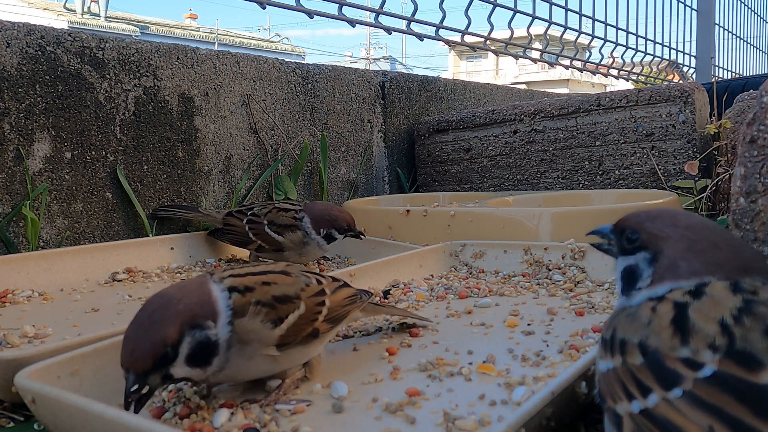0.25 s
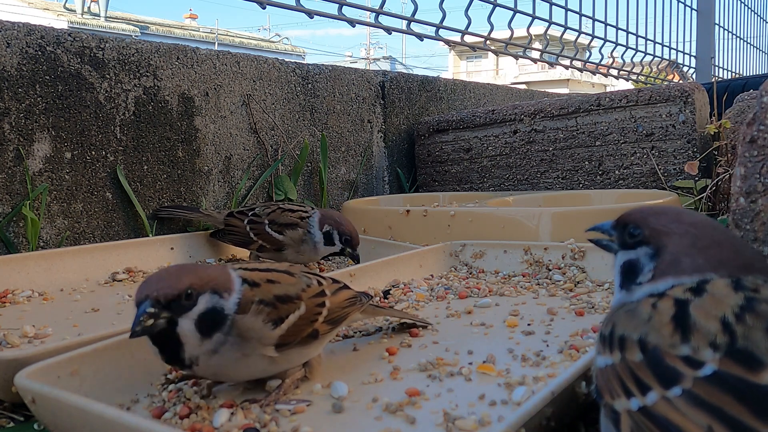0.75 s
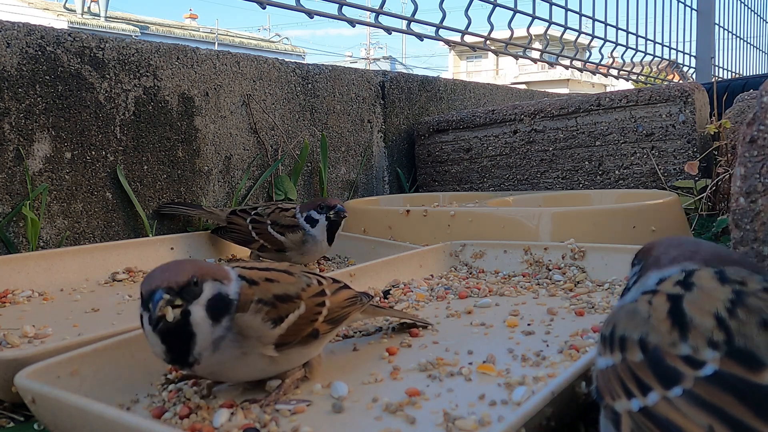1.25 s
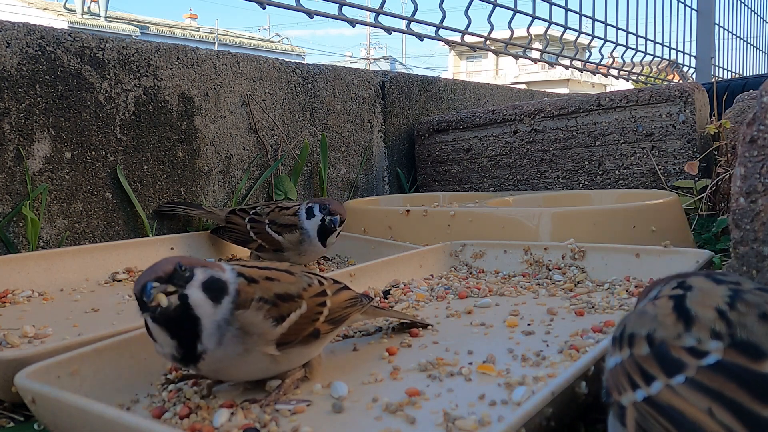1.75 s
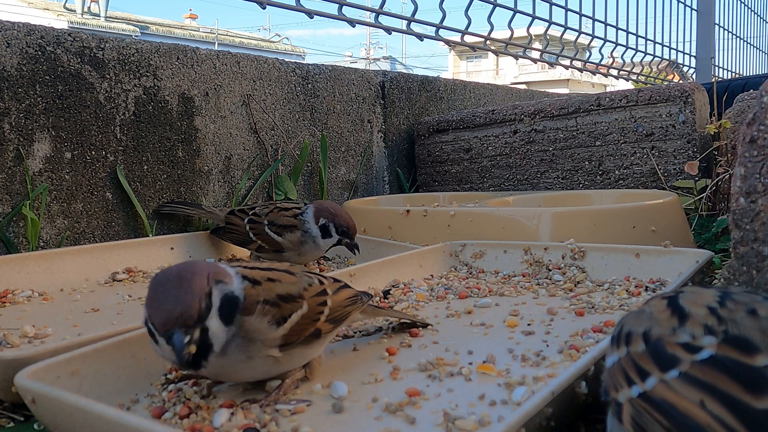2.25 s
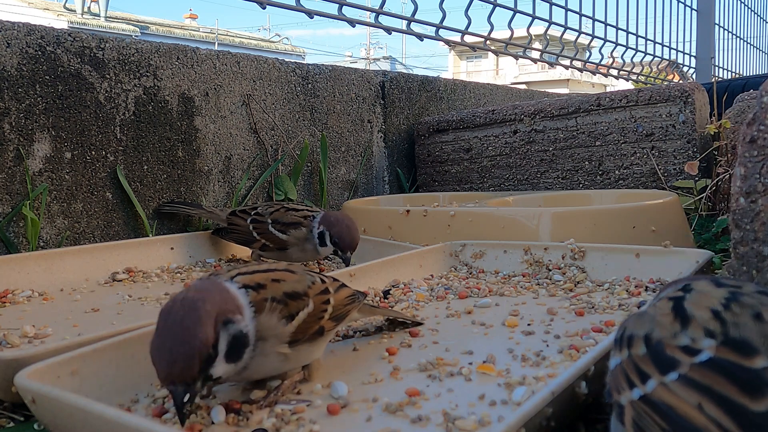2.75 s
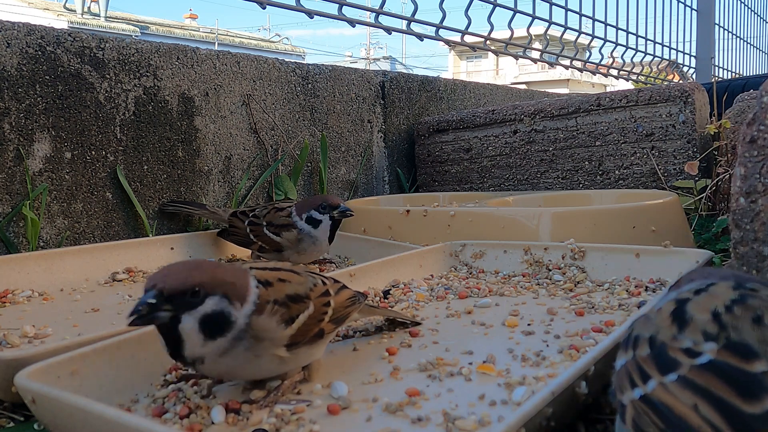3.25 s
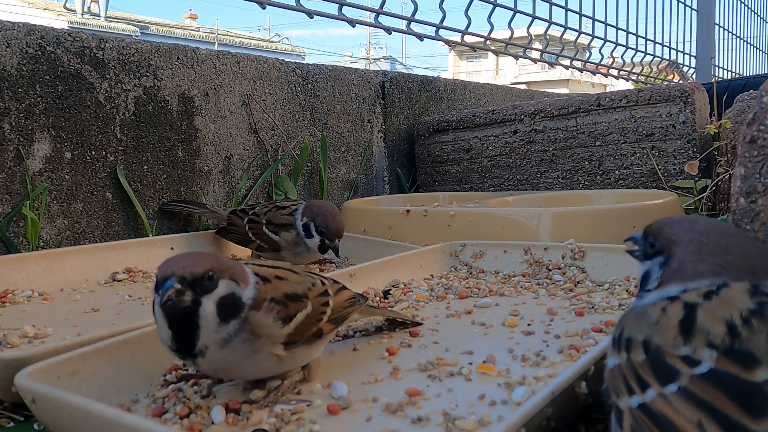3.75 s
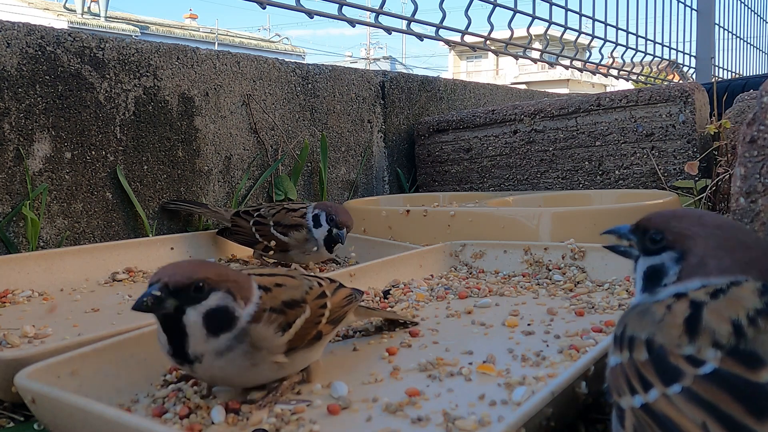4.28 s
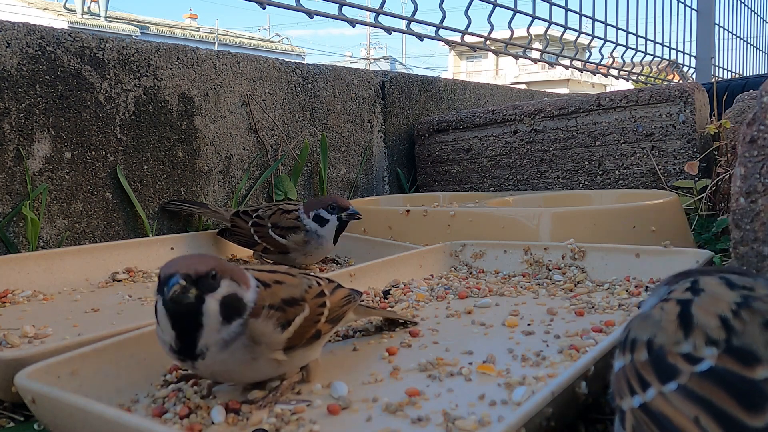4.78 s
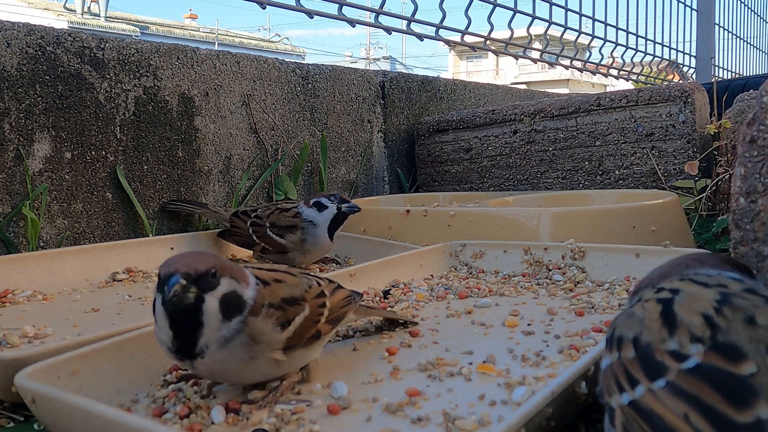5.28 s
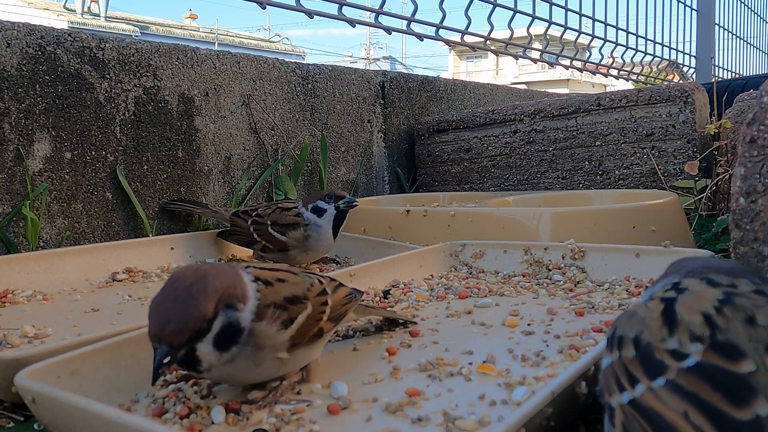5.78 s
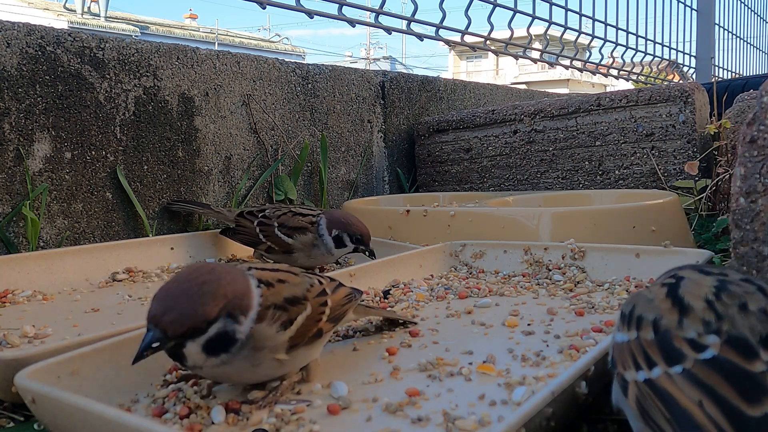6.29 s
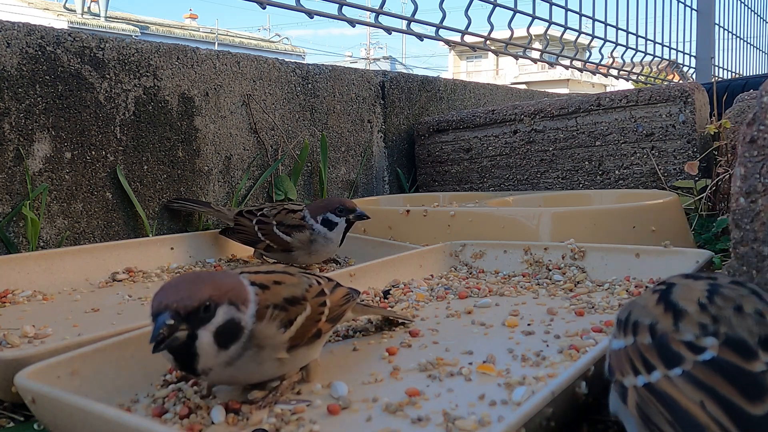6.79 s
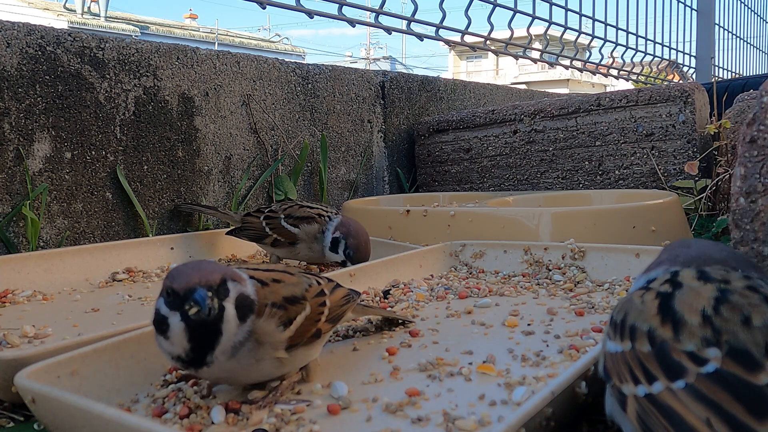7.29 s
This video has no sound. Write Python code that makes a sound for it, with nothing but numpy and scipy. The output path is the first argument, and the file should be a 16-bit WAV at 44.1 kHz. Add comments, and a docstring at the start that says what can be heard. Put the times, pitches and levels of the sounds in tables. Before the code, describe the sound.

Irregular beak taps, brittle husk clicks and brief seed patter, very close, over soft distant traffic rumble and faint far-off chirps.

```python
"""A small walled yard: sparrows feed on plastic trays close by.
Beak blows are filtered impulses that excite tray modes; husks crack as impulses in sprays of noise.
Loose seed patters as tiny pings and slides as noise; crumbs land and feet scuff the tray.
Another small bird calls far off in swept tones, mostly heard as echo.
Under it all lie a low town rumble and air noise, both shaped from random noise."""
import sys
import numpy as np
from scipy import signal
from scipy.fft import rfft, irfft, next_fast_len
from scipy.io import wavfile
from scipy.ndimage import uniform_filter1d, map_coordinates

SR = 44100
rng = np.random.default_rng(int(sys.argv[2]) if len(sys.argv) > 2 else 0)


def unload_audio(sound):
    """Save the sound as a 16-bit wav file, at the path given as the first command line argument."""
    columns = np.transpose(np.atleast_2d(sound))
    # keep every value between -1 and 1, then stretch to whole-number steps
    steps = np.round(np.clip(columns, -1, 1) * 32767)
    wavfile.write(sys.argv[1], SR, steps.astype(np.int16))


N = 332073
HIT = 4096  # samples in one contact sound
TOP_HZ = 12700  # band limit

# shoves of a beak or foot through the loose seed:
# t/s at the height, relative level/dB, rise/s, settling/s
SHOVES = [(0.17, -72, .04, .12), (0.655, -80, .02, 0.098), (0.795, -76, 0.029, 0.2),
          (0.91, -77.5, 0.048, 0.33), (1.56, -88.5, 0.23, 0.45), (2.424, -66.5, 0.0095, 0.12),
          (2.604, -51, 0.12, 0.16), (3.201, -63.5, 0.011, 0.16), (4.272, -52.5, 0.027, 0.14),
          (4.64, -74, 0.37, .3), (6.04, -74, 0.062, 0.31), (6.32, -73, .02, .12), (6.496, -67, 0.018, 0.17),
          (6.868, -68, 0.1, 0.086), (7.255, -64, 0.058, .16), (7.384, -67.5, 0.043, 0.19)]


def amp(db):
    """Level in decibels to amplitude ratio."""
    return 10 ** (np.asarray(db) / 20)


def unit(x):
    """Normalisation to rms 1."""
    return x / np.sqrt(np.mean(x ** 2) + 1e-20)


def along(points, hz):
    """Interpolation of (Hz, value) points on a logarithmic frequency axis."""
    f, v = np.transpose(points)
    return np.interp(np.log(hz + 1), np.log(f + 1), v)


def wobble(rate, size=N):
    """Slow random modulation: a smooth curve through random knots, rate of them a second."""
    knots = rng.standard_normal(int(size * rate / SR) + 4)
    return map_coordinates(knots, [np.arange(size) * rate / SR])


def filtered(x, response):
    """Linear filtering: the spectrum times a response of frequency."""
    m = next_fast_len(N + SR // 2)
    return irfft(rfft(x, m) * response(np.fft.rfftfreq(m, 1 / SR)), m)[..., :N]


def causal(gain):
    """Minimum phase: folding the cepstrum makes this gain ring only after its onset."""
    cepstrum = irfft(np.log(np.maximum(gain, 1e-6)))
    cepstrum[1:HIT // 2] *= 2
    cepstrum[HIT // 2 + 1:] = 0
    return np.exp(rfft(cepstrum))


def add(track, s, sound):
    """Superposition: mix a sound in at s seconds."""
    part = track[..., max(round(s * SR), 0):][..., :sound.shape[-1]]
    part += sound[..., :part.shape[-1]]


def pecks(click_db=7.5, knock_db=-12, spot_octaves=0.41, contact_s=.0007):
    """Modal excitation: a beak clicks through the seed, and the spot it hits decides which modes answer."""
    # beak blows: t/s, click level/dB before click_db, ring f/Hz, sheen level/dB,
    # thud level/dB, knock level/dB, knock f/Hz, rebound delay/s
    beak_blows = [(0.1129, -22.5, 2900, -49, -38.5, -27.5, 1590, .00067),
                  (2.4338, -34.5, 3200, -29.5, -53.5, -35.5, 1550, .00042),
                  (2.4762, -11.5, 4900, -34.5, -33, -19, 1715, .00062),
                  (2.627, -12, 2900, -27, -38, -18.5, 1242, .0018),
                  (2.9982, -26.5, 2600, -25, -56.5, -36.5, 1620, .00113),
                  (4.2829, -22, 6900, -21, -45, -32.5, 1076, .0017),
                  (6.528, -34.5, 3250, -17.5, -54, -45.5, 1670, .00063),
                  (6.5501, -17.5, 4430, -16.5, -33, -29.5, 2000, .0018)]
    # the tray floor bending as a whole: f/Hz, relative level/dB, t60/s
    floor_modes = [(410, -8, 0.052), (558.6, 1, .06), (692, -2.5, 0.044)]
    # stiffer modes of the tray: f/Hz, relative level/dB, t60/s
    stiff_modes = [(994, 2.5, 0.011), (1200, -5, 0.017), (1510, -2, 0.025), (2023, -2, 0.018),
                   (2200, -5, 0.0059), (2600, 0, 0.023)]
    out = np.zeros((2, N))
    mode_hz = np.array(stiff_modes)[:, 0]
    for s, db, ring_hz, sheen_db, thud_db, tray_db, knock_hz, rebound_s in beak_blows:
        click = snap(knock_db, ring_hz, sheen_db, echo=0.36, echo_s=rebound_s, bass_db=-14.5)
        add(out, s, amp(db + click_db) * click)
        spot = np.exp(-.5 * (np.log2(mode_hz / knock_hz) / spot_octaves) ** 2)
        thud = amp(thud_db) * ringing(floor_modes).sum(0)
        knock = amp(tray_db) * spot @ ringing(stiff_modes)
        add(out, s + contact_s, (thud + knock) * amp([[-.5], [.5]]))  # right louder by 1 dB
    return out


def ringing(modes):
    """Damped modal vibration: one decaying sine per mode, neighbours of opposite sign."""
    t = np.arange(HIT) / SR
    sines = []
    for k, (hz, db, t60) in enumerate(modes):
        decay = amp(db + rng.normal(0, 1) - 60 * t / t60)
        sines.append((-1) ** k * decay * np.sin(2 * np.pi * hz * t))
    return np.array(sines)


def cracks(count=3):
    """Brittle fracture: husks split at once or in stages, each with its own pitch."""
    # single cracks: t/s, level/dB before the husk gain, knock level/dB, ring f/Hz, sheen level/dB
    splits = [(0.0507, -50.5, -9, 5700, -8), (0.163, -37.5, -14, 2320, -20), (0.525, -47.5, 17, 2400, -55),
              (0.6465, -46.5, -55, 4170, -59), (0.7907, -50, -17, 2500, -23),
              (0.9043, -27.5, -42, 4770, -42), (1.735, -44, -13, 2570, -12),
              (1.945, -36.5, -24, 4800, -10.5), (2.0352, -48, -44, 7100, -3.5),
              (2.2984, -53.5, 2, 2230, -50), (2.5495, -35.5, -22, 2830, -51), (2.5625, -35, -20, 4850, -12),
              (2.5729, -29.5, -16, 4800, -22), (2.5901, -31, -5, 4100, -22),
              (2.6676, -38, -17.5, 2600, -14), (2.6821, -38.5, -21, 4500, -12),
              (2.7305, -40.5, -32, 6850, -8), (2.774, -32, -18.5, 4250, -33),
              (2.8154, -40.5, -20, 7350, 6.5), (2.8753, -30, -30, 2510, -35),
              (3.033, -43.5, -15.5, 5670, -28.5), (3.3595, -47, -5.5, 2220, -42.5),
              (3.3771, -43.5, -12, 2270, -26), (3.5666, -39, -17, 2180, -27),
              (3.7183, -40.5, -19.5, 4020, -22.5), (4.0493, -39.5, 1, 6360, -43),
              (4.1066, -39, -22, 2450, -13), (4.2488, -39.5, -21.5, 4130, -27),
              (4.277, -25, -38, 6160, -23), (4.384, -45, -8, 3130, -26), (4.413, -18.5, -15, 3200, -45),
              (4.4545, -47, -35, 7400, -11.5), (4.489, -41, -34, 7100, -16), (4.6244, -42, -43, 5200, -25),
              (4.6777, -40.5, -43, 5850, -16.5), (4.777, -33, -30.5, 2760, -44),
              (4.988, -32, -5.5, 2600, -30.5), (5.1796, -52.5, -14, 6700, -6),
              (5.672, -41.5, -14, 6200, -18), (5.8736, -54.5, -2, 6400, -19), (6.05, -47, -13, 5190, -7),
              (6.0741, -40.5, -13.5, 2540, -49), (6.313, -40, -25, 4960, -32.5),
              (6.3286, -43, -38, 5080, -24.5), (6.7363, -30.5, -29.5, 5550, -11),
              (6.8499, -46, -25, 6630, -12), (6.8663, -45, -10.5, 2230, -32.5),
              (6.8828, -48.5, -8, 2740, -18), (7.2188, -50, -19, 5730, -7), (7.2513, -30.5, -31, 7200, -15),
              (7.2739, -42.5, -24, 5050, -26), (7.3043, -29.5, -17.5, 5800, -11),
              (7.3936, -38.5, -52, 6240, -7)]
    # seeds crushed in quick stages: t/s, level/dB before the husk gain, knock level/dB, ring f/Hz,
    # sheen level/dB, time between stages/s, loss per stage/dB
    crushings = [(3.2031, -35.5, -43, 5200, -20, 0.0054, 2), (4.309, -26.5, -23, 6500, -15.5, 0.008, 4),
                 (4.698, -55.5, -31, 2720, -35.5, .0102, 0.5),
                 (6.5716, -33.5, -9.5, 4600, -20.5, 0.0071, .5)]
    out = np.zeros((2, N))
    for s, db, knock_db, ring_hz, sheen_db in splits:
        add(out, s, husk(db, knock_db, ring_hz, sheen_db))
    for s, db, knock_db, ring_hz, sheen_db, gap_s, loss_db in crushings:
        for stage in range(count):
            add(out, s + stage * gap_s, husk(db - stage * loss_db, knock_db, ring_hz, sheen_db))
    return out


def husk(db, knock_db, ring_hz, sheen_db, gain_db=11.0):
    """Impulsive radiation of a light body: a dry tick of husk with little bass."""
    return amp(db + gain_db) * snap(knock_db, ring_hz, sheen_db, echo=0.19, echo_s=.00097, bass_db=-35)


def snap(knock_db, ring_hz, sheen_db, echo, echo_s, bass_db, splinter=1.4, splinter_t60=0.0082,
         rise_s=0.0016, ring_db=6, ring_octaves=0.18, dulling=0.13):
    """Source and filter: an impulse in a spray of splinters, with a rebound; stereo, its mean of energy 1."""
    t, hz = np.arange(HIT) / SR, np.fft.rfftfreq(HIT, 1 / SR)
    spray = rng.standard_normal((3, HIT)) * amp(-60 * t / splinter_t60) * (1 - np.exp(-(t / rise_s) ** 2))
    spray = rfft(spray / np.linalg.norm(spray, axis=1)[:, None])
    chance = rng.standard_normal(3)
    impulse = np.exp(-2j * np.pi * hz * 0.0009)  # the body gives way a moment after the first touch
    force = impulse + splinter * (spray[0] + 0.51 * spray[1:])  # one shared spray, one per channel
    bounce = 1 + echo * np.exp(-2j * np.pi * hz * echo_s * (1 + 0.023 * chance[0]))
    # f/Hz, level/dB
    colour = [(200, knock_db + bass_db), (800, knock_db - 15), (1500, knock_db + 7.5), (2600, -9.5),
              (6800, dulling * sheen_db - 8.0), (8800, sheen_db), (12000, sheen_db - 2.5),
              (15000, sheen_db - 19)]
    ring = ring_db * np.exp(-.5 * (np.log2((hz + 1) / ring_hz) / ring_octaves) ** 2)
    halves = np.array([[.5], [-.5]])
    # the right channel hears the tray a little before the left one
    lag = np.exp(-2j * np.pi * hz * halves * (1.5e-5 + 3e-6 * chance[1]))
    sound = irfft(force * bounce * lag * causal(amp(along(colour, hz) + ring)))
    return sound / np.linalg.norm(sound.mean(0)) * amp(halves * (0.8 + 0.5 * chance[2]))


def crumbs(count=4, knock_db=-18, ring_hz=4300, sheen_db=-14, colour_spread_db=7, pitch_octaves=.5,
           follows=0.77):
    """Random impacts: each shove throws up crumbs that land as the seed settles, louder after harder shoves."""
    base_db, spread_db = -57, 3  # before the husk gain
    span = .6  # share of the settling time in which they land
    out = np.zeros((2, N))
    usual_db = np.mean([row[1] for row in SHOVES])
    for s, db, _, settle_s in SHOVES:
        landings = s + span * settle_s * rng.random(count)
        for when, (weight, pitch, hardness) in zip(landings, rng.standard_normal((count, 3))):
            size_db = base_db + follows * (db - usual_db) + spread_db * weight
            tilt_db = colour_spread_db * hardness
            crumb_hz = ring_hz * 2 ** (pitch_octaves * pitch)
            add(out, when, husk(size_db, knock_db - tilt_db, crumb_hz, sheen_db + tilt_db))
    return out


def loose_seed(blows, gain_db=2.0, sliding=0.53):
    """Granular friction: pushed and shaken seed patters in grains and slides in noise."""
    # relative spectrum of the seed: f/Hz, level/dB
    seed_colour = [(240, -40.5), (400, -6.5), (590, -5), (823, -18.5), (1510, -3.5), (1740, -4), (3430, -8),
                   (5060, -3), (7690, -7), (11700, -17.5), (12600, -28.5), (16300, -55), (22000, -120)]
    shaken = jolts(blows, jolt_db=-19, settle_t60=0.15, brush_s=.005)
    stir = np.hypot(amp(gain_db) * stirring(), shaken)
    slide = rng.standard_normal(N) + 0.35 * rng.standard_normal((2, N))
    patter = grains() + sliding * slide
    clumps = amp(3.5 * wobble(220))  # grains tumble in small groups
    return stir * unit(filtered(patter * clumps, lambda hz: amp(along(seed_colour, hz))))


def stirring():
    """Exponential rise and decay: each shove moves the seed and lets it settle; a gain per sample."""
    t = np.arange(N) / SR
    range_db = 22.5  # gained over a rise and lost over a settling
    return sum(amp(db - range_db * np.maximum((s - t) / rise_s, (t - s) / settle_s))
               for s, db, rise_s, settle_s in SHOVES)


def jolts(blows, jolt_db, settle_t60, brush_s):
    """Energy smoothing: the beak brushes the seed on the way in, and the seed settles after the blow."""
    t = np.arange(-SR // 4, SR // 4) / SR
    # -120 in amp() is 60 dB of energy per settle_t60
    shape = np.exp(np.minimum(t, 0) / brush_s) * amp(-120 * np.maximum(t, 0) / settle_t60)
    energy = signal.fftconvolve(blows.mean(0) ** 2, shape / shape.sum(), mode="same")
    return amp(jolt_db) * np.sqrt(np.abs(energy))


def grains(rate=1900, scatter_db=3.5, life_s=.0004, size=96):
    """Shot noise of rms 1: each grain is a tiny damped ping with its own pitch, strength and side."""
    when, pitch, strength, side = rng.random((int(rate * N / SR), 4)).T[..., None]
    t = np.arange(size) / SR
    level = amp(-scatter_db * np.log(0.04 + strength))
    pings = level * np.exp(-t / life_s) * np.sin(2 * np.pi * pitch * TOP_HZ * t)
    at = ((when * (N - size)).astype(int) + np.arange(size)).ravel()
    return unit(np.array([np.bincount(at, (pings * (1 + way * (side - .5))).ravel(), N) for way in (1, -1)]))


def scuffs(sharpness=4.3):
    """Friction driving a resonator: uneven slips of claws and beaks set the tray floor rumbling."""
    # drags over the tray floor: t/s, length/s, body f/Hz, level/dB
    drags = [(0.125, 0.04, 510, -63.5), (2.579, 0.045, 1130, -62), (2.761, 0.046, 533, -73.5),
             (3, 0.065, 662, -76), (4.272, 0.021, 670, -48.5), (6.298, 0.053, 679, -69.5),
             (6.532, 0.067, 587, -51.5), (7.24, 0.085, 855, -65.5)]
    out, hz = np.zeros(N), np.fft.rfftfreq(HIT * 2, 1 / SR)
    for s, length, body_hz, db in drags:
        size = int(length * SR)
        slips = rng.standard_normal(size) * amp(2.8 * wobble(300, size=size))
        slips *= np.sin(np.linspace(0, np.pi, size))
        damping = 1j * hz * body_hz / sharpness
        body = damping / (body_hz ** 2 - hz ** 2 + damping)
        sound = irfft(rfft(slips, HIT * 2) * body / (1 + 1j * hz / (2 * body_hz)))
        add(out, s, amp(db) * sound / np.std(sound[:size]))
    return out


def far_calls():
    """Frequency modulation: chirps sweep up and droop, some whistled and some buzzy with flutter."""
    # calls: t/s, length/s, top f/Hz, upward sweep/share, level/dB before the path gains, pitch flutter/share
    chirps = [(0.429, 0.13, 3570, .045, -84, 0.017), (1.73, .14, 3600, 0.083, -74.5, 0.02),
              (2.032, .11, 4450, 0.11, -71.5, 0.077), (3.262, .06, 3670, 0.11, -71, .02),
              (3.512, .13, 4380, 0.2, -72, .05), (5.181, 0.077, 3885, 0.12, -75, .01),
              (6.351, .06, 3820, .15, -67.5, .012), (6.425, 0.046, 3670, .02, -74, .025)]
    top_at, droop = .4, 0.04  # share of a call spent rising, share of the pitch lost afterwards
    out = np.zeros(N)
    for s, length, top_hz, sweep, db, flutter in chirps:
        u = np.linspace(0, 1, int(length * SR))
        glide = np.interp(u, [0, top_at, 1], [1 - sweep, 1, 1 - droop])
        pitch = top_hz * glide * (1 + flutter * wobble(670, size=len(u)))
        swell = np.sqrt(np.abs(np.sin(np.pi * u))) * amp(3.3 * wobble(50, size=len(u)))
        add(out, s, amp(db) * unit(swell * np.sin(2 * np.pi * np.cumsum(pitch) / SR)))
    return out


def yard(x, stretch=1):
    """Diffuse reverberation: the walls answer with a decaying noise tail; stretch lengthens it."""
    # reverberation: f/Hz, t60/s at stretch 1
    decay_times = [(300, 0.067), (1500, 0.17), (5000, 0.19), (12000, 0.14)]
    hz, t, z = signal.stft(rng.standard_normal((2, SR // 2)), SR, nperseg=256)
    decay = amp(-60 * t / (stretch * along(decay_times, hz)[:, None]))
    tail = signal.istft(z * decay, SR, nperseg=256)[1]
    tail *= 1 - np.exp(-np.arange(tail.shape[1]) / SR / 0.0024)  # soft onset
    return signal.fftconvolve(x[None], tail / np.linalg.norm(tail[0]), axes=1)[:, :N]


def town():
    """Superposed random noise: a heaving traffic rumble with deep swells, under nearly steady air noise."""
    # relative spectrum of the rumble: f/Hz, level/dB
    rumble_colour = [(11, -41.5), (18, -8.5), (54, 3), (70, 1), (97, -7.5), (140, -15.5), (180, -47),
                     (310, -120)]
    # relative spectrum of the air noise: f/Hz, level/dB
    air_colour = [(60, -40), (110, -3.5), (160, -6), (220, -9), (308, -14.5), (440, -25.5), (650, -30.5),
                  (860, -39), (1130, -29.5), (1450, -35.5), (2000, -42.5), (3300, -53.5), (5200, -49.5),
                  (7500, -50), (9000, -61.5), (12500, -66), (15000, -89.5)]
    # deep swells of the rumble: t/s, half width/s (to 1/e of the gain in dB), gain/dB
    swells = [(0.8, 0.08, 8.5), (5.451, 0.038, 13), (7.42, 0.036, 6)]
    rumble_db, heave_db, heave_rate, air_db = -57, 1.73, 9, -63  # heave_rate: knots a second
    t = np.arange(N) / SR
    swell_db = sum(db * np.exp(-((t - s) / width_s) ** 2) for s, width_s, db in swells)
    heaving = amp(rumble_db + heave_db * wobble(heave_rate) + swell_db)
    return heaving * rush(rumble_colour, patchy_db=0.42) + amp(air_db) * rush(air_colour, patchy_db=1.0)


def rush(spectrum, patchy_db):
    """Partial coherence: outdoor noise, nearly mono in the bass, with patches of random gain."""
    # stereo width: f/Hz, side minus mid level/dB
    side_levels = [(60, -25.5), (110, -26), (200, -14), (350, -9.5), (630, -3), (1140, -2.5), (3700, -3.5),
                   (6700, -1), (12000, -7.5)]
    z = signal.stft(rng.standard_normal((2, N)), nperseg=512)[2]
    field = uniform_filter1d(rng.standard_normal(z.shape[1:]), size=6, axis=0)
    field = uniform_filter1d(field, size=16, axis=1)
    pair = signal.istft(z * amp(patchy_db * unit(field)), nperseg=512)[1][:, :N]

    def response(hz):
        return amp(along(spectrum, hz)) * np.array([np.ones_like(hz), amp(along(side_levels, hz))])

    mid, side = filtered(pair, response)
    return np.array([mid + side, mid - side]) / np.std(mid)


def scene():
    """Direct-to-reverberant ratio: near feeding is almost dry, the far calls are mostly echo."""
    blows, calls = pecks() + cracks(), far_calls()
    feeding = blows + crumbs() + loose_seed(blows) + scuffs()
    # the far calls ring on longer than sounds inside the yard
    far = amp(-11.5) * calls + amp(-9) * yard(calls, stretch=1.3)
    return feeding + amp(-16) * yard(feeding.mean(0)) + far + town()


def record(dry):
    """Steep low-pass filtering: little remains above the band limit."""
    return filtered(dry, lambda hz: 1 / np.sqrt(1 + (hz / TOP_HZ) ** 60))


dry = scene()
out = record(dry)
unload_audio(out)
```